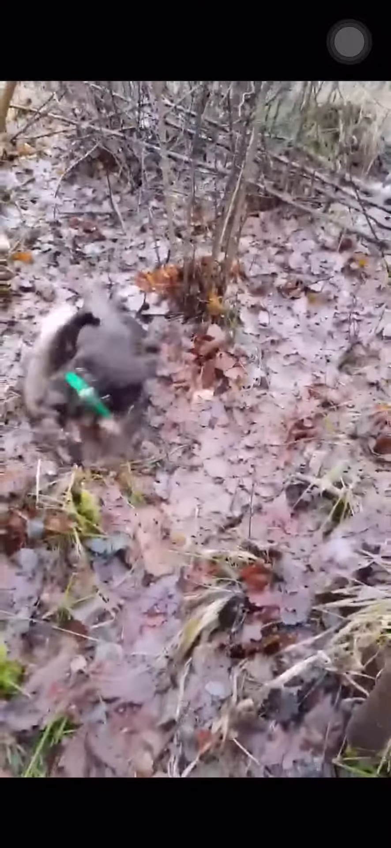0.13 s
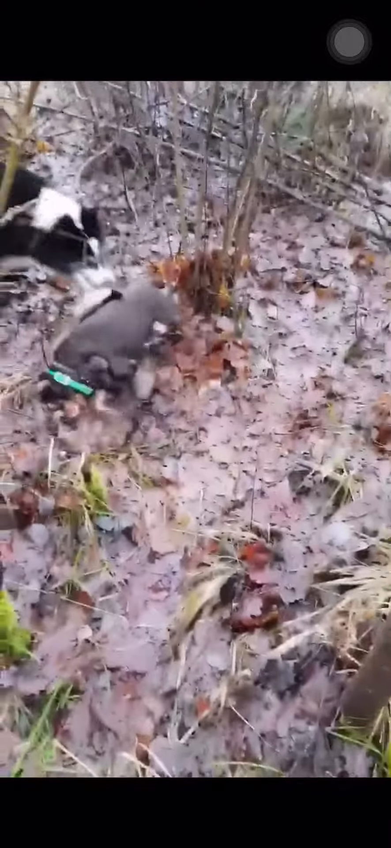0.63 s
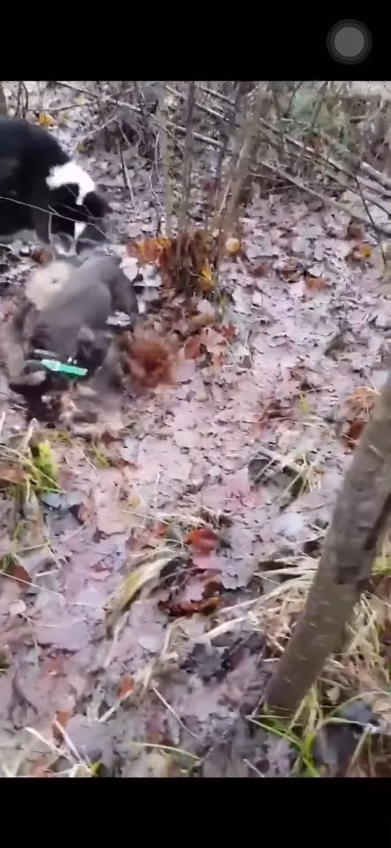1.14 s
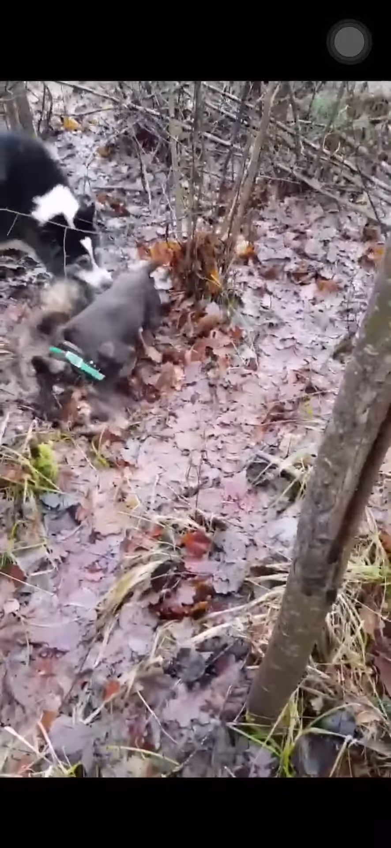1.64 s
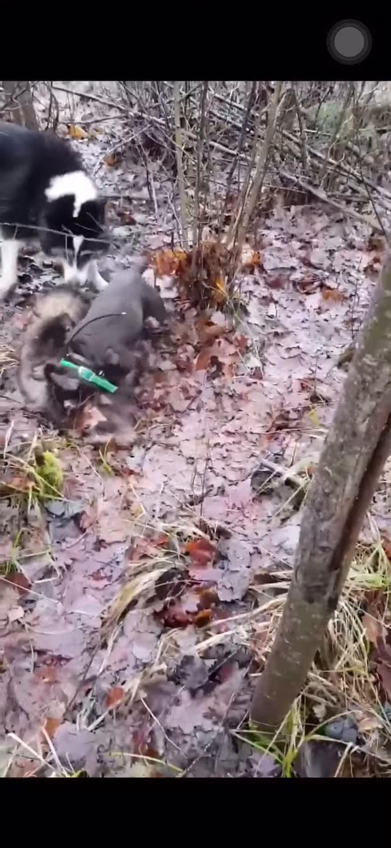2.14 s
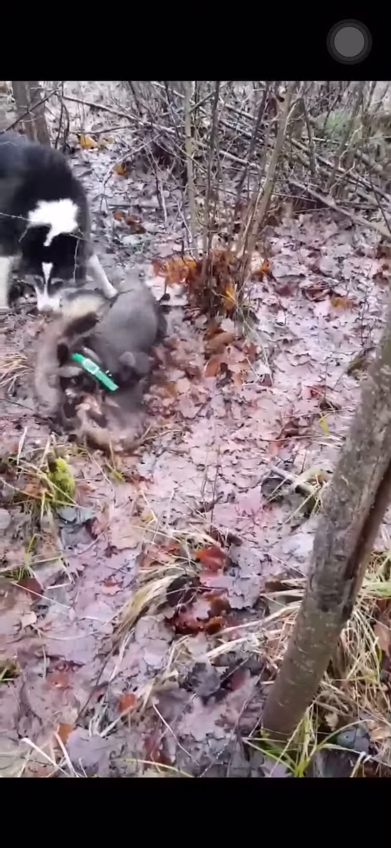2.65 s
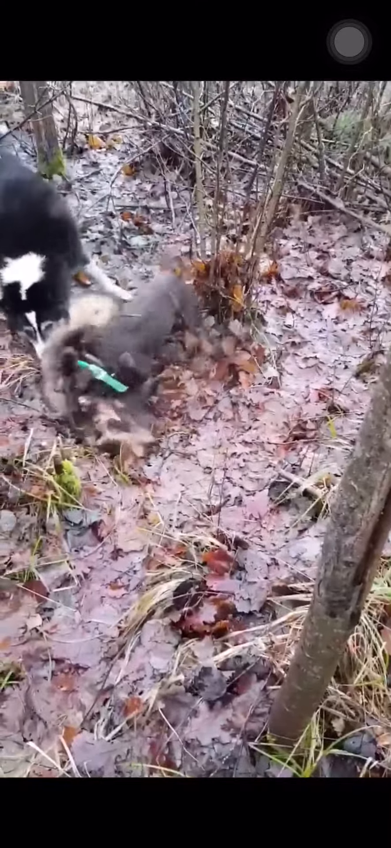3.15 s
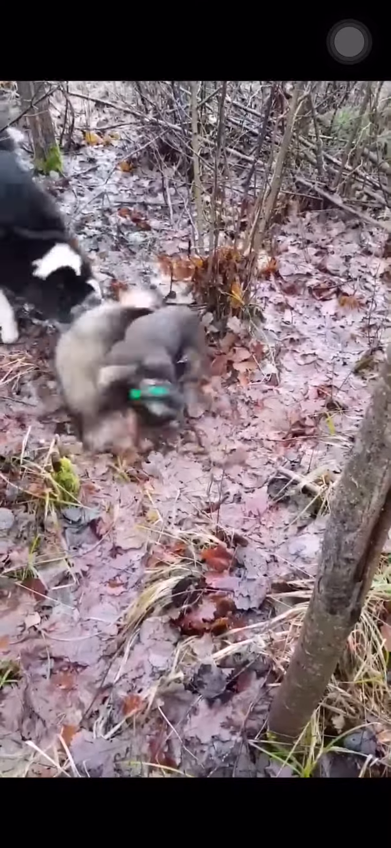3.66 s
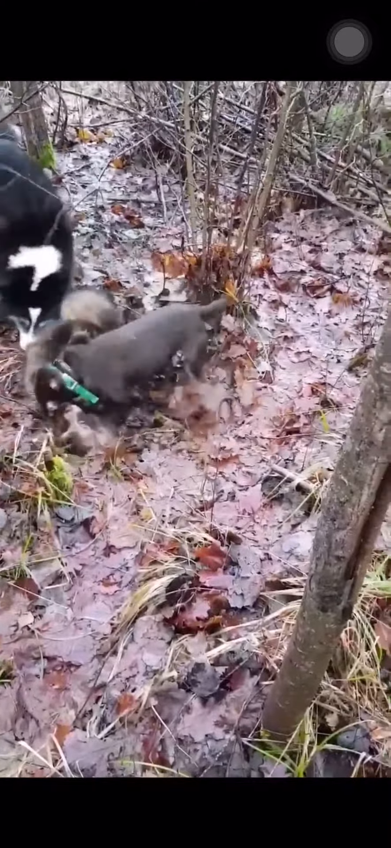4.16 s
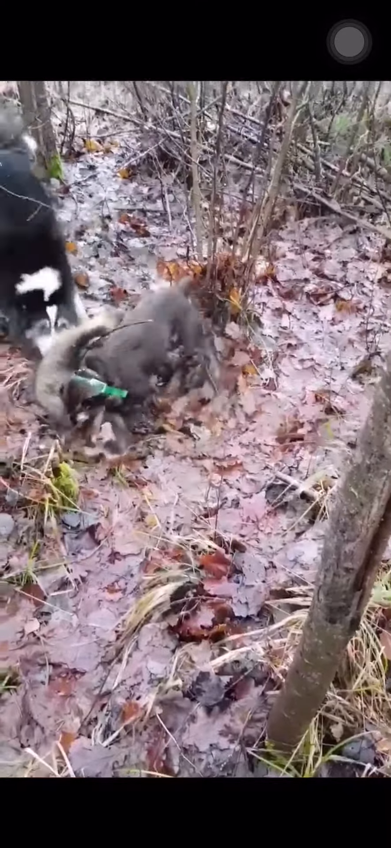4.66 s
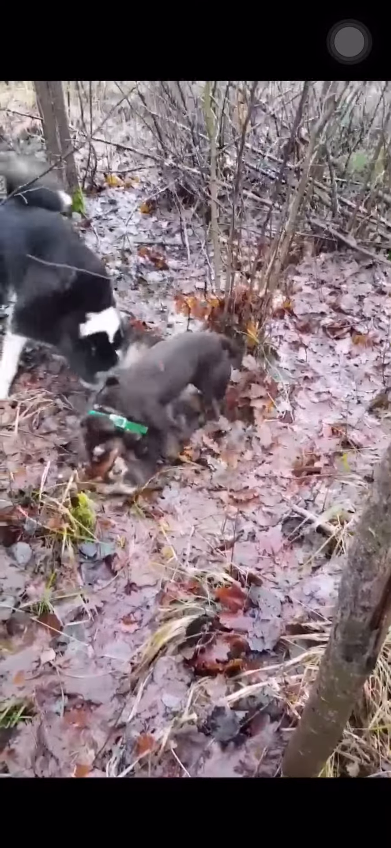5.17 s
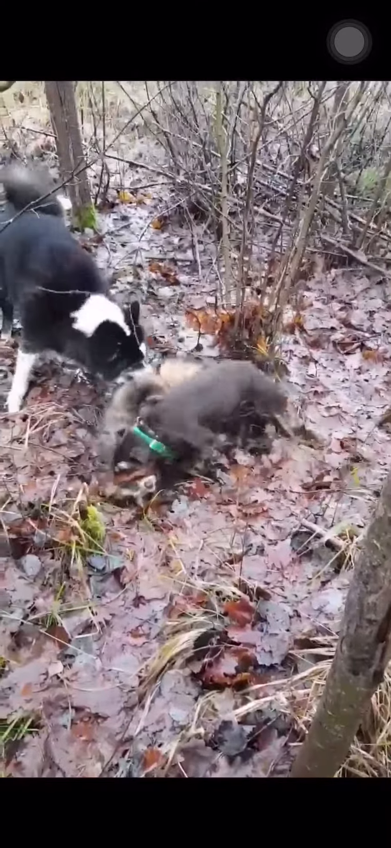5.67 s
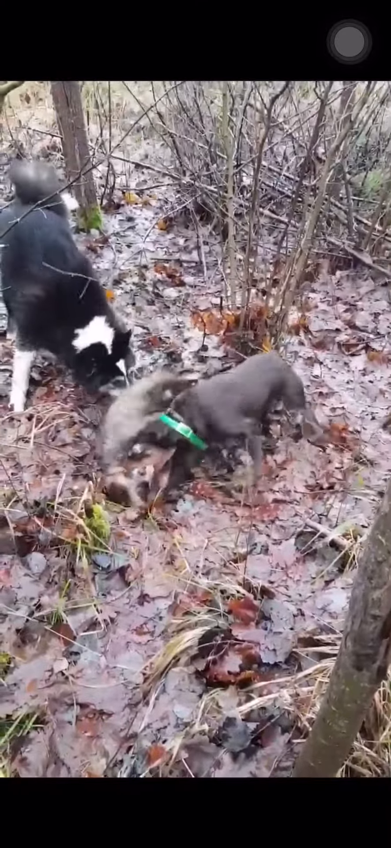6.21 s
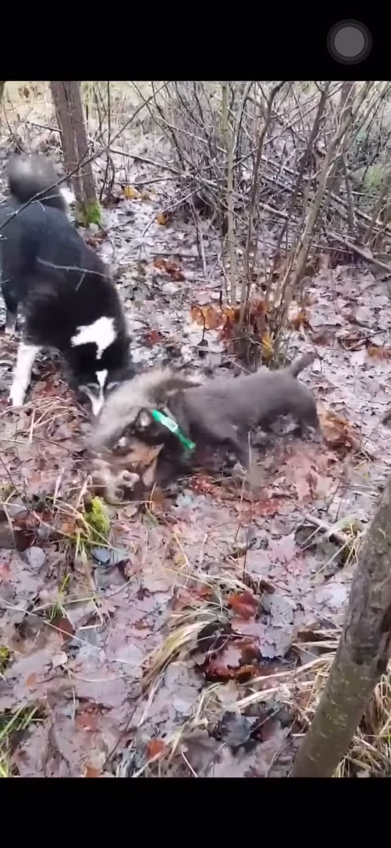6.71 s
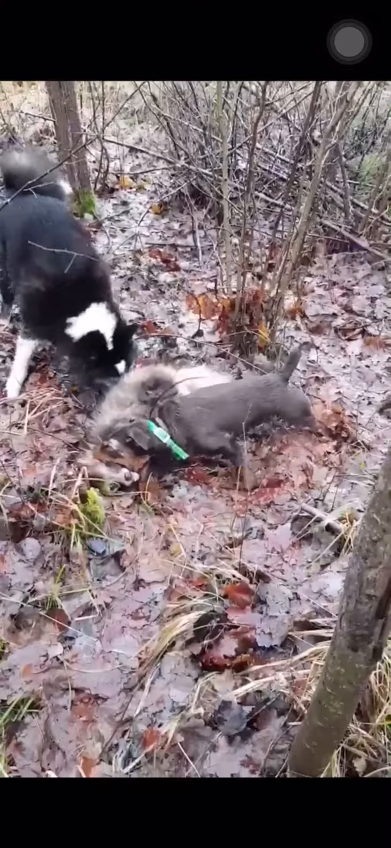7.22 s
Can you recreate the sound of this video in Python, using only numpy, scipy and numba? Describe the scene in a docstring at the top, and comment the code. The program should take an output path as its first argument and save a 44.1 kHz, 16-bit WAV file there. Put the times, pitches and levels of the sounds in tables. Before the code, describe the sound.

For about three seconds a seized animal cries out harshly in three separate bursts, rattling and sagging in pitch, with small pauses of faint leaf rustle. After that comes a rough scuffle in dry leaves: crunches, sharp twig cracks, heavy snorting breaths, brief muffled dog growls, a barely audible whine and tiny yip. Low air rumble; dry, close outdoor sound, centred.

```python
"""Seized animal and dog in dry leaves

A seized animal screams three hoarse, wavering cries in leafy woodland while a dog holds it: fold pulses
and gated breath ring moving resonances. The dog snarls at first, then growls low through its grip, as a
throbbing tone with jaw rasp. Bodies scuffle and pant, as random cracks and shaped noise; twigs snap,
a thin whine and a yip are faint tones, low air noise rumbles. One close microphone."""
import sys
import numpy as np
from scipy import signal
from scipy.fft import rfft, irfft, next_fast_len
from scipy.io import wavfile
from scipy.ndimage import uniform_filter1d, minimum_filter1d, map_coordinates
from numba import njit

SR = 44100
rng = np.random.default_rng(int(sys.argv[2]) if len(sys.argv) > 2 else 0)


def linear_from_db(decibels):
    """Turn decibels (scalar or array-like) into linear amplitude factors; 0 gives 1."""
    return 10 ** (np.asarray(decibels, float) / 20)


def waveform_to_disk(signal):
    """Save audio, clipped to [-1, 1], as 16-bit WAV at the path in sys.argv[1]."""
    frames = np.transpose(np.atleast_2d(signal))
    scaled = np.clip(frames, -1, 1) * 32767
    samples = np.round(scaled).astype(np.int16)
    wavfile.write(sys.argv[1], SR, samples)


N = 323253

# growls, one list each: t/s, pitch f/Hz, chest level/dB
GROWL_CONTOURS = [
    [(0, 199.7, -43), (.03, 189.5, -45), (.055, 205, -34), (.1, 189.5, -43), (.2, 179.8, -46.5),
     (.3, 170.6, -48), (.34, 169.8, -56)],
    [(3.8, 244.3, -59), (3.828, 245.9, -47), (3.866, 248.9, -58), (3.92, 194.5, -47.5), (3.98, 194.5, -46),
     (4.034, 227.1, -52.5), (4.07, 220, -56)],
    [(4.43, 190.1, -60.5), (4.466, 216, -50.5), (4.532, 173, -53), (4.588, 229.9, -45), (4.836, 196.5, -49),
     (4.858, 177.5, -47), (4.89, 170.9, -62)],
    [(5.74, 130, -58), (5.768, 131.6, -62), (5.78, 134.2, -55), (5.798, 151.3, -56.5), (5.81, 159.2, -45.5),
     (5.83, 158.2, -65)],
    [(6.11, 164.5, -44.5), (6.148, 169.4, -30.5), (6.28, 157.2, -32.5), (6.33, 157.7, -37),
     (6.38, 198.7, -34.5), (6.436, 145.9, -44), (6.47, 146.8, -52)],
    [(6.65, 118.5, -69), (6.678, 117.3, -47), (6.724, 117.6, -55), (6.77, 117.2, -62)],
    [(7.05, 188.7, -51), (7.082, 197.6, -34.5), (7.114, 200.2, -27.5), (7.146, 181.1, -36.5),
     (7.188, 181.1, -32), (7.266, 183.1, -36), (7.33, 174.7, -33.5)],
]
# lunges in the leaves: peak t/s, crackle level/dB, length/s, fine hiss re crackle/dB, trampling re crackle/dB
LUNGE_EVENTS = [(0.658, -54, .04, -1.5, -4), (0.758, -57, 0.033, -16, -7), (0.896, -62.5, .1, -3.5, -25),
                (0.963, -58.5, 0.1, -6, 13.5), (1.831, -61.5, 0.17, -15.5, 5),
                (1.904, -53.5, 0.082, -6.5, 2.5), (2.011, -60.5, 0.052, 0.5, -20),
                (3.427, -45, 0.22, -12, -5.5), (3.711, -46, .12, -3.5, -3), (3.761, -45, 0.053, -18, -5.5),
                (3.843, -37.5, 0.18, -16, -9.5), (3.918, -43.5, .1, -8.5, 7.5),
                (3.978, -48, 0.15, -10, 7.2), (4.095, -52, .14, -20.5, -16), (4.219, -51, 0.13, -1.5, -5),
                (4.443, -44, 0.18, -14.5, -3.5), (4.653, -39.5, 0.6, -31.5, -4.5),
                (4.766, -40.5, 0.15, -11, 2.5), (5.299, -33.5, 0.12, -7, -4.5),
                (5.487, -41.5, 0.098, 2, 4.5), (5.753, -57.5, 0.11, -3.5, -6),
                (6.025, -44, 0.079, 1.5, -3.5), (6.205, -50, 0.44, -9, -12), (6.396, -42, 0.29, -8, -2),
                (6.476, -48, 0.021, -1.5, 2), (6.605, -50, .07, -0.5, -4), (6.681, -47, 0.27, -8.5, -15),
                (6.873, -53, 0.52, -0.5, -1), (7.13, -49, 0.4, -12.5, 3), (7.32, -45, 0.17, -27, -1)]
SHAPE_HOP = 64  # samples between points of a level shape
LUNGE_RISE = 0.32  # share of the length before the peak


def unit(x):
    """x at rms 1."""
    return x / np.sqrt(np.mean(x ** 2) + 1e-20)


def curves(rows):
    """One value per sample for each column after the time."""
    s, *cols = np.transpose(rows)
    return [np.interp(np.arange(N) / SR, s, c) for c in cols]


def sounding(calls):
    """1 while a call lasts, with 6 ms edges."""
    t = np.arange(N) / SR
    return sum(np.clip(np.minimum(t - c[0][0], c[-1][0] - t) / .006, 0, 1) for c in calls)


def held(rows, calls):
    """The columns of one row per call, held from each onset to the next."""
    later_onsets = [c[0][0] for c in calls[1:]]
    return np.array(rows)[np.searchsorted(later_onsets, np.arange(N) / SR)].T


def wobble(rate_hz):
    """A smooth random curve, rate_hz knots a second."""
    knots = rng.standard_normal(int(N * rate_hz / SR) + 4)
    return map_coordinates(knots, [np.arange(N) * rate_hz / SR])


def filtered(x, response):
    """x times a complex response of frequency."""
    m = next_fast_len(N + 8192)
    return irfft(rfft(x, m) * response(np.fft.rfftfreq(m, 1 / SR)), m)[..., :N]


def coloured(x, spectrum):
    """x through (f/Hz, gain/dB) points on a log axis, at rms 1."""
    f, db = np.transpose(spectrum)
    return unit(filtered(x, lambda hz: linear_from_db(np.interp(np.log(hz + 1), np.log(f), db))))


def resonant(x, modes):
    """x through parallel fixed (f/Hz, width/Hz, gain/dB) resonances of alternating sign, at rms 1."""
    def body(f):
        total = 0
        for k, (c, w, db) in enumerate(modes):
            total = total + (-1) ** k * linear_from_db(db) * 1j * f * w / (c * c - f * f + 1j * f * w)
        return total
    return unit(filtered(x, body))


@njit
def ring(x, hz, width_hz, sr):
    """A two-pole band-pass whose centre moves."""
    y, r = np.zeros(len(x)), np.exp(-np.pi * width_hz / sr)
    for i in range(2, len(x)):
        y[i] = x[i] - x[i - 2] + 2 * r * np.cos(2 * np.pi * hz[i] / sr) * y[i - 1] - r * r * y[i - 2]
    return y


def swells(rows, rise):
    """One level shape/dB per (peak t/s, level/dB, length/s) row: a rise to the peak and a slower fall."""
    edge_db, curvature = 26.5, 1.36  # fall at either end; curve of the slopes
    s, db, length = np.transpose(rows)[:3, :, None]
    late = np.arange(0, N + SHAPE_HOP, SHAPE_HOP) / SR - s
    side = length * np.where(late < 0, rise, 1 - rise)
    return db - edge_db * np.abs(late / side) ** curvature


def summed(shapes_db):
    """The joint gain of overlapping shapes by power, one value per sample."""
    gain = np.sqrt(np.sum(linear_from_db(2 * shapes_db), axis=0))
    return np.interp(np.arange(N), np.arange(len(gain)) * SHAPE_HOP, gain)


def folds(cycle, rough, swell_db):
    """One pulse a cycle, scattered by roughness, and the breath each cycle gates; together near rms 1."""
    exact = np.interp(np.arange(1, int(cycle[-1])), cycle, np.arange(N))
    at = exact.astype(int)
    chance = rng.standard_normal((len(at), 2))
    period = 1 / np.gradient(cycle)[at]
    when = np.clip(exact + .1 * rough[at] ** 1.5 * period * chance[:, 0], 0, N - 2)
    size = linear_from_db(5 * rough[at] * chance[:, 1]) * np.sqrt(period)
    # each pulse is shared by two samples, for a fractional time
    whole = when.astype(int)
    pulses = np.bincount(whole, size * (1 - when % 1), N) + np.bincount(whole + 1, size * (when % 1), N)
    swell = linear_from_db(swell_db) / np.sqrt(uniform_filter1d(linear_from_db(2 * swell_db), size=2000))
    breath = unit(np.exp(-1.8 * (cycle % 1)) * rng.standard_normal(N))
    return swell * np.sqrt(1 - rough ** 2) * unit(pulses), swell * rough * breath


def growl_voice():
    """Jaw rasp and low shudder levels, held through each growl."""
    # one row per growl: jaw rasp re chest/dB, low shudder re chest/dB
    voice_rows = [(16.5, -13), (2, -14), (-1, -40), (3, -7), (-3, -19), (-13, -1), (-0.5, -21)]
    return held(voice_rows, GROWL_CONTOURS)


def rumble():
    """Low, lumpy air noise at the microphone; bodies thud and growls shudder in the same range."""
    # low air rumble: t/s, level/dB
    air_level = [(0.0, -59), (0.63, -72.5), (1.84, -77.5), (4.45, -84), (5.49, -57.5), (5.98, -70.5),
                 (6.41, -56.5), (6.96, -69), (7.33, -64)]
    # rumble spectrum: f/Hz, gain/dB
    air_spectrum = [(12, -64.5), (20, -25.5), (43, -22.5), (97, -7.5), (130, -7.5), (170, -19.5),
                    (290, -120)]
    thud_db = -16.5  # re trampling
    trample_db = np.transpose(LUNGE_EVENTS)[4, :, None]
    thuds = summed(swells(LUNGE_EVENTS, LUNGE_RISE) + trample_db + thud_db)
    chest_db = curves(np.concatenate(GROWL_CONTOURS))[1]
    shudder = sounding(GROWL_CONTOURS) * linear_from_db(chest_db + growl_voice()[1])
    level = np.sqrt(linear_from_db(2 * curves(air_level)[0]) + thuds ** 2 + shudder ** 2)
    return level * linear_from_db(2.9 * wobble(4.9)) * coloured(rng.standard_normal(N), air_spectrum)


def snaps():
    """Each twig gives a noise crack and a short dull ring."""
    # twig snaps: t/s, level/dB, ring f/Hz
    twigs = [(0.663, -35.5, 544), (0.954, -44, 544.6), (3.412, -36.5, 2098), (3.523, -39.5, 2020),
             (3.7, -39, 398), (4.004, -32.5, 594), (4.461, -32.5, 3400), (5.275, -33, 4000),
             (5.474, -33, 1780), (6.011, -43.5, 526), (6.097, -33, 605), (6.598, -49.5, 1850)]
    out, t = np.zeros(N + SR), np.arange(1500) / SR
    for s, db, hz in twigs:
        # 60 dB decay in 2.5 ms and 28 ms
        crack = 1.7 * linear_from_db(-60 * t / 0.0025) * rng.standard_normal(len(t))
        tone = linear_from_db(-60 * t / 0.028) * np.sin(2 * np.pi * hz * t)
        out[round(s * SR):][:len(t)] += linear_from_db(db + 1.5) * (crack + tone)
    return out[:N]


def crunch(rate_hz, spread_db, noise):
    """Random cracks, few big and many small, on a bed of noise."""
    size = linear_from_db(spread_db * rng.exponential(size=N).clip(0, 4))
    hits = (rng.random(N) < rate_hz / SR) * size * rng.choice([-1, 1], N)
    return linear_from_db(1.8 * wobble(25)) * (unit(hits) + noise * rng.standard_normal(N))


def scuffle():
    """Leaves crackle, rustle and crush under the bodies; pants and snorts share the rustle's middle range."""
    # quiet background level between the lunges: t/s, level/dB
    background = [(.57, -54), (.68, -63), (.94, -61), (1.72, -59.5), (1.96, -59.5), (2.165, -72.5),
                  (3.3, -57.5), (3.36, -58.5), (3.66, -58.5), (4.4, -60), (5.07, -60), (5.45, -52),
                  (5.85, -60), (6.0, -71), (6.1, -52), (6.8, -75), (7.04, -69)]
    # crackle, fine hiss, trampling, middle range: re background/dB
    background_colour_db = [0.8, -4.5, -0.5, 1.2]
    # pants and snorts: peak t/s, level/dB, length/s
    pants = [(.664, -49.5, .04), (.966, -54, 0.056), (1.8, -51, 0.38), (4.57, -38.5, 0.15),
             (4.8, -33.5, 0.22), (4.88, -43, 0.14), (4.12, -53, 0.13), (5.125, -34.5, .12),
             (3.43, -45, .06), (4.68, -37, .2), (5.71, -44, 0.21), (5.81, -57, 0.0813), (6.1, -51.5, 0.02),
             (6.42, -35, 0.19), (6.57, -51.5, 0.12), (7.25, -44, .25)]
    # spectra of crackle, fine hiss and trampling: f/Hz, gain/dB
    crackle_spectrum = [(1710, -28.5), (2900, -11), (3270, -12), (3850, -7), (4800, -14), (5400, -16.5),
                        (7020, -50), (11900, -120)]
    fine_spectrum = [(3120, -37.5), (5300, -4), (6060, -8), (7350, -6.5), (8120, -10), (10600, -32),
                     (17900, -120)]
    trample_spectrum = [(71, -31.5), (120, -11), (262, -3.5), (440, 0.5), (651, -4), (1240, -10),
                        (1500, -18), (1950, -45), (3300, -120)]
    # resonances of the middle range: f/Hz, width/Hz, gain/dB
    middle_modes = [(1580, 1240, -4.5), (2100, 500, 3.5), (2534, 680, -4)]
    rustle_body_db = -2.6  # middle-range rustle of leaves in each lunge, re crackle
    lunge_db = swells(LUNGE_EVENTS, LUNGE_RISE)
    fine_db, trample_db = np.transpose(LUNGE_EVENTS)[3:, :, None]
    middle_db = np.vstack([lunge_db + rustle_body_db, swells(pants, rise=0.34)])
    moves = [lunge_db, lunge_db + fine_db, lunge_db + trample_db, middle_db]
    background_db, = curves(background)
    levels = [np.hypot(summed(m), linear_from_db(background_db + db)) for m, db in zip(moves, background_colour_db)]
    crackle, fine, trample, middle = levels
    crackle = crackle * coloured(crunch(rate_hz=900, spread_db=3.5, noise=0.89), crackle_spectrum)
    fine = fine * coloured(crunch(rate_hz=2400, spread_db=3.5, noise=1.1), fine_spectrum)
    middle_noise = resonant(crunch(rate_hz=550, spread_db=2.5, noise=1.0), middle_modes)
    middle = middle * resonant(middle_noise, [(2010, 6100, 0)])
    trample = trample * coloured(crunch(rate_hz=470, spread_db=2.0, noise=11.0), trample_spectrum)
    return crackle + fine + middle + trample


def whine():
    """A faint thin whine and a short hoarse yip: an unsteady tone and its octave."""
    # one list per call: t/s, pitch f/Hz, level/dB, octave level/dB, pitch tremor/share
    whine_calls = [
        [(5.81, 612, -70, -70, .012), (5.9, 607, -61, -68, .04), (6.0, 600, -61, -72, .012)],
        [(6.53, 540, -66, -56, .2), (6.56, 550, -60, -45, .2), (6.59, 570, -66, -54, .2)],
    ]
    hz, db, octave_db, tremor = curves(np.concatenate(whine_calls))
    phase = 2 * np.pi * np.cumsum(hz * (1 + tremor * wobble(700))) / SR
    tones = linear_from_db(db) * np.sin(phase) + linear_from_db(octave_db) * np.sin(2 * phase)
    return sounding(whine_calls) * linear_from_db(3.1 * wobble(60)) * np.sqrt(2) * tones


def growls():
    """A throbbing, unsteady chest tone at the pitch, and rough pulses through the closed jaw."""
    # closed jaw: f/Hz, width/Hz, gain/dB
    jaw = [(562, 480, 4), (924, 207, 8), (1250, 140, -2.5), (2230, 350, -5.5)]
    # t/s, roughness 0-1
    roughness = [(0, .9), (.34, .9), (3.8, .65), (4.43, .48), (6.1, .56), (7.33, .56)]
    hz, chest_db = curves(np.concatenate(GROWL_CONTOURS))
    rasp_db = chest_db + growl_voice()[0]
    cycle = np.cumsum(hz * (1 + .045 * wobble(55))) / SR
    throb_db = 2.5 * np.cos(2 * np.pi * np.cumsum(28 + 4 * wobble(10)) / SR) + 1.8 * wobble(45)
    tone = unit(linear_from_db(throb_db) * (np.sin(2 * np.pi * cycle) + .1 * np.sin(4 * np.pi * cycle)))
    flutter = unit(ring(ring(rng.standard_normal(N), hz, 90., SR), hz, 150., SR))
    chest = .94 * tone + .33 * flutter
    rasp = resonant(sum(folds(cycle, curves(roughness)[0], .8 * throb_db)), jaw)
    gate = sounding(GROWL_CONTOURS)
    return gate * linear_from_db(chest_db) * chest, gate * linear_from_db(rasp_db) * rasp


def cries():
    """Fold pulses, shaken by a slower rattle, ring a chest and four resonances that move with the gape."""
    # one list per cry: t/s, effort/dB, gape as treble re mouth body/dB
    contours = [
        [(0.0, -25.5, -4.5), (0.026, -42, -10.5), (0.058, -14.5, 0.5), (0.116, -17, 2.5), (0.156, -20.5, -2),
         (0.176, -31, -3), (0.234, -22, -8), (0.284, -18.5, -2), (0.318, -30, -3), (0.338, -23, -11),
         (0.388, -13, -9.5), (0.496, -24.5, -14.5), (0.502, -25.5, -10.5), (0.514, -16.5, -14.5),
         (0.58, -58, 2)],
        [(0.985, -31.5, -22.5), (0.997, -16.5, -8.5), (1.101, -19, -7.5), (1.127, -26, -6), (1.229, -27, -20.5),
         (1.253, -16.5, -14), (1.321, -24, -19), (1.371, -20, -11), (1.379, -26.5, -12), (1.455, -19.5, -17.5),
         (1.463, -30.5, -9.5), (1.525, -25.5, -10), (1.577, -36, -9.5), (1.633, -31, -15.5), (1.679, -36.5, -4),
         (1.693, -43, -6.5)],
        [(2.175, -78, 13.5), (2.183, -36.5, -8), (2.199, -27, -5), (2.257, -29, -11), (2.453, -12.5, -7.5),
         (2.569, -11, -13), (2.715, -14.5, -13.5), (2.755, -20.5, -16), (2.767, -27.5, -9), (2.809, -12, -12.5),
         (2.847, -13.5, -8), (2.881, -23, -15.5), (2.901, -21.5, -7), (2.933, -16, -11), (2.985, -26.5, -5.5),
         (3.015, -15.5, -9), (3.171, -21.5, -6), (3.181, -18.5, -3.5), (3.249, -21.5, -7.5), (3.278, -45.5, -1)],
    ]
    # one list per cry: t/s, pitch f/Hz
    pitch = [
        [(0.0, 184), (0.066, 213.8), (0.124, 207.5), (0.172, 200.5), (0.296, 218), (0.322, 224.6),
         (0.39, 227.5), (0.412, 229.1), (0.488, 198.9), (0.52, 186.7), (0.556, 203.5), (0.58, 201)],
        [(0.985, 220.0), (1.037, 235.2), (1.057, 214.3), (1.139, 182.8), (1.177, 179.2), (1.205, 170.2),
         (1.257, 197), (1.313, 180.1), (1.35, 189.9), (1.412, 165.8), (1.48, 162.6), (1.506, 171.3),
         (1.544, 161.7), (1.582, 148.4), (1.616, 149.8), (1.65, 165.7), (1.71, 158.5)],
        [(2.17, 154.4), (2.236, 161.3), (2.252, 160.2), (2.296, 165.7), (2.306, 170.1), (2.398, 172.5),
         (2.45, 210.6), (2.468, 220.7), (2.508, 232.3), (2.552, 240.8), (2.652, 235.2), (2.67, 224.6),
         (2.7, 223.6), (2.742, 220.4), (2.774, 205.7), (2.8, 223.9), (2.822, 231.2), (2.87, 216.9),
         (2.9, 202.6), (2.938, 219), (2.986, 205.5), (3.02, 209.3), (3.08, 200.1), (3.108, 193.3), (3.18, 172),
         (3.25, 178.1), (3.274, 168.3), (3.29, 169)],
    ]
    # t/s, roughness 0-1, rattle rate f/Hz
    hoarseness = [(0, .7, 112), (.17, .62, 114), (.22, .72, 100), (.39, .63, 80), (.56, .7, 52),
                  (1, .4, 60), (1.1, .35, 55), (1.25, .38, 45), (1.7, .48, 50), (2.18, .7, 60),
                  (2.29, .6, 60), (2.31, .12, 60), (2.37, .15, 60), (2.41, .6, 85), (2.46, .3, 105),
                  (2.54, .25, 118), (2.58, .45, 118), (2.61, .11, 60), (2.95, .14, 60), (2.99, .3, 60),
                  (3.03, .13, 60), (3.11, .25, 90), (3.17, .65, 60)]
    # one row per cry: throat/dB and chest/dB at usual effort and gape, resonance scale/share,
    # rattle depth at full roughness/dB, hiss fade/(dB/s)
    posture = [(-31.5, -48, 0.94, 10.5, 18.5), (-34.5, -52.5, 0.93, 8, 9.5), (-32, -60, 0.96, 6, 14.5)]
    # throat, lower mouth, upper mouth, bright: f/Hz at usual gape and scale 1
    centre_hz = [791, 1850, 2410, 3533]
    # same four: shift as the jaws open/(Hz/dB)
    slide_hz_per_db = [0.7, -2.5, 8.5, 11.5]
    # same four: width of the first pass/Hz
    widths_hz = [600, 530, 610, 810]
    # resonances behind the teeth: f/Hz, width/Hz, gain/dB
    teeth = [(2950, 300, 0), (4350, 450, -5)]
    # hiss spectrum above the teeth: f/Hz, gain/dB
    hiss_spectrum = [(2710, -35), (4600, -2.5), (4940, -12), (5890, -5.5), (6450, -16.5), (7600, -13.5),
                     (8120, -16), (10600, -54.5), (17900, -120)]
    usual_db, usual_gape_db = -20, -9

    effort_db, gape_db = curves(np.concatenate(contours))
    throat_db, chest_db, scale, shake_db, fade_db_per_s = held(posture, contours)
    push = effort_db - usual_db
    opening = np.clip(gape_db - usual_gape_db, -15, 15)
    throat_db = throat_db + 0.51 * push + 0.096 * opening
    chest_db, bright_db = chest_db + 0.067 * push, effort_db + gape_db
    # the tongue never rests: each resonance wanders
    centres = [(hz * scale + slide * opening) * (1 + 0.039 * wobble(15))
               for hz, slide in zip(centre_hz, slide_hz_per_db)]

    rough, rattle_hz = curves(hoarseness)
    rattle = np.cos(2 * np.pi * np.cumsum(rattle_hz * (1 + .08 * wobble(30))) / SR)
    cycle = np.cumsum(curves(np.concatenate(pitch))[0]) / SR
    pulses, breath = folds(cycle, rough, shake_db * rough * rattle)
    # breath grows against the pulses toward the treble
    sources = [(pulses + airy * breath) / np.sqrt(1 + (airy ** 2 - 1) * rough ** 2)
               for airy in (.7, 1, 1.3, 3)]

    # each resonance is passed twice, which darkens the valleys between them
    throat, lower, upper, bright = [unit(ring(ring(x, c, w, SR), c, 0.92 * w, SR))
                                    for x, c, w in zip(sources, centres, widths_hz)]
    mouth = unit(lower - linear_from_db(1.5) * upper - linear_from_db(-17) * resonant(sources[1], [(1236, 170, 0)]))
    bright = unit(bright + resonant(resonant(sources[2], teeth), [(3470, 11000, 0)]))
    chest = resonant(resonant(sources[3], [(220, 98, 0)]), [(216, 130, 0)])
    voice = linear_from_db(throat_db) * throat + linear_from_db(effort_db + 0.35) * mouth
    voice = voice + linear_from_db(bright_db - 0.5) * bright + linear_from_db(chest_db) * chest

    # the hiss above the teeth tires through each cry
    onset_s = held([[c[0][0]] for c in contours], contours)[0]
    tired_db = fade_db_per_s * (np.arange(N) / SR - onset_s)
    flicker_db = 2.5 * wobble(13)
    hiss = -linear_from_db(bright_db - 20 - tired_db + flicker_db) * coloured(sources[3], hiss_spectrum)
    return sounding(contours) * (voice + hiss)


def ground(x, hop=4096):
    """Direct sound with close echoes off ground and bodies, redrawn every 93 ms as the animals move."""
    t = np.arange(hop) / SR
    out, fade = np.zeros(N + 6 * hop), np.hanning(2 * hop)
    padded = np.pad(x, (hop, 2 * hop))
    for start in range(0, N + hop, hop):
        echo = rng.standard_normal(len(t)) * (linear_from_db(-60 * t / .042) + linear_from_db(-32 - 60 * t / .15))
        response = rfft(echo / np.linalg.norm(echo), 4 * hop) + .75  # .75: direct sound
        # the echoes ripple the spectrum finely but leave its broad shape alone
        response /= np.sqrt(uniform_filter1d(np.abs(response) ** 2, size=170))
        block = padded[start:start + 2 * hop] * fade
        out[start:start + 4 * hop] += irfft(rfft(block, 4 * hop) * response)
    return 1.1 * out[hop:hop + N]


def scene():
    """All sources, heard alike on both channels."""
    chest, rasp = growls()
    near = ground(cries() + rasp + whine()) + snaps()
    # small mouths and twigs radiate little bass
    near = filtered(near, lambda hz: (1j * hz / (1j * hz + 110)) ** 3)
    mono = near + chest + scuffle() + rumble()
    return np.array([mono, mono])


def low_pass(x):
    """Removes everything above the highest recorded frequency."""
    return signal.sosfilt(signal.butter(12, 8270, fs=SR, output="sos"), x)


def record(dry):
    """A limiter holds the loudest peaks; a band limit falls from 8300 Hz to nothing at 8550 Hz."""
    needed = np.minimum(1, .93 / (np.abs(dry[0]) + 1e-9))
    gain = uniform_filter1d(minimum_filter1d(needed, size=600), size=300)
    mix = filtered(dry * gain, lambda hz: np.clip((8300 - hz) / 250 + 1, 0, 1))
    return low_pass(mix)


dry = scene()
out = record(dry)
waveform_to_disk(out)
```